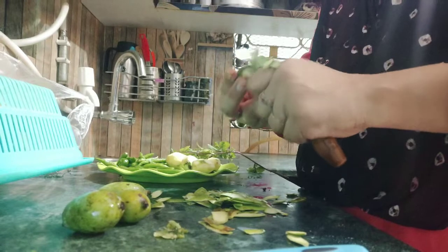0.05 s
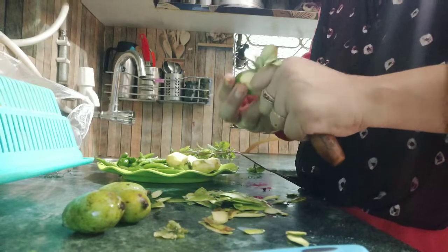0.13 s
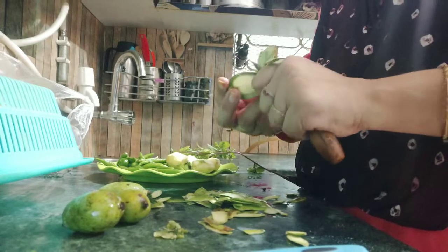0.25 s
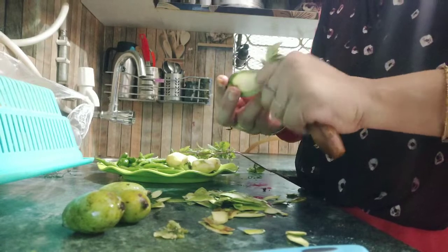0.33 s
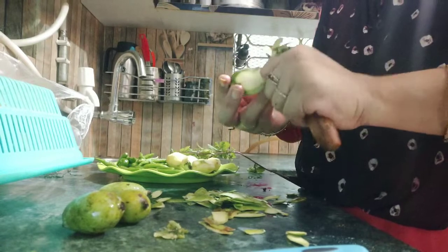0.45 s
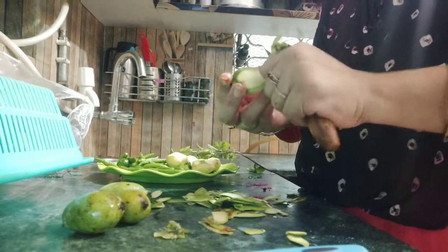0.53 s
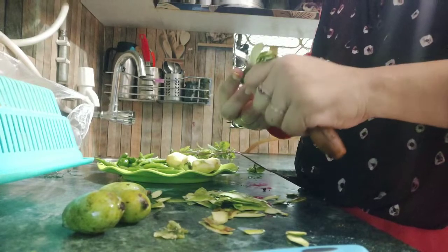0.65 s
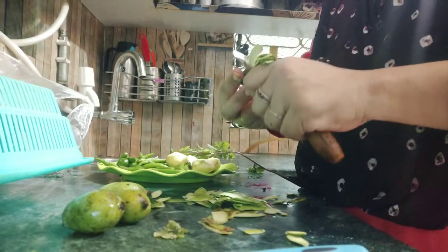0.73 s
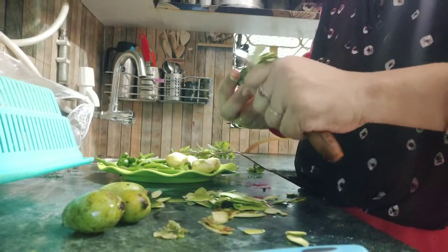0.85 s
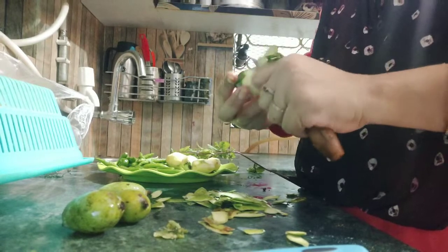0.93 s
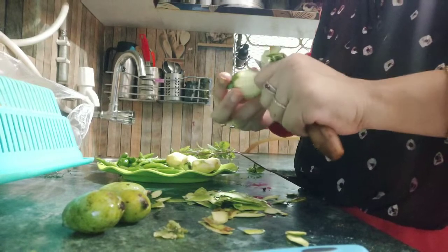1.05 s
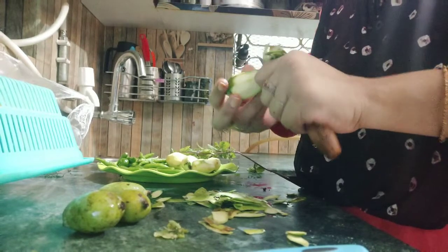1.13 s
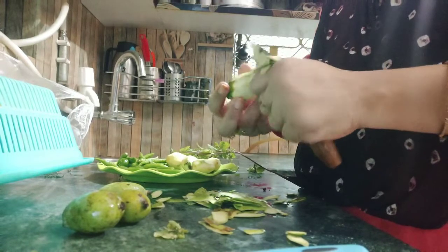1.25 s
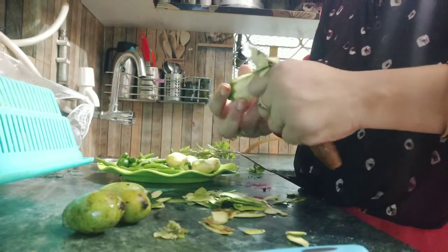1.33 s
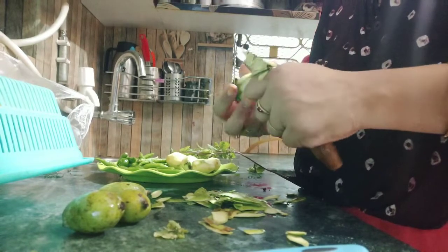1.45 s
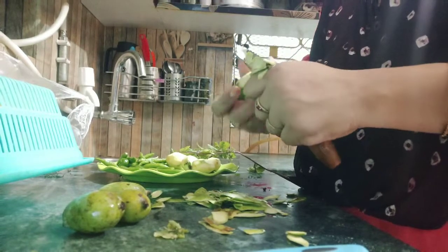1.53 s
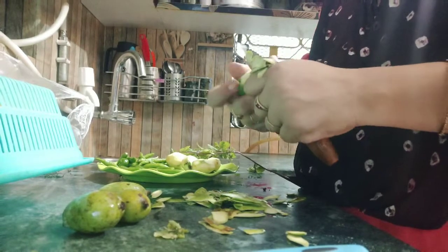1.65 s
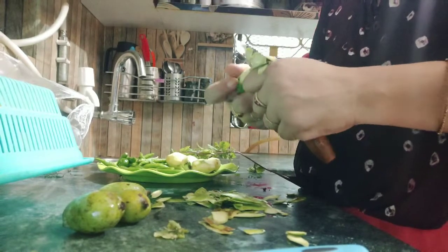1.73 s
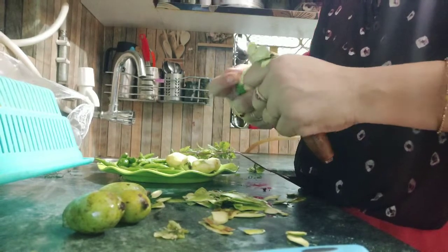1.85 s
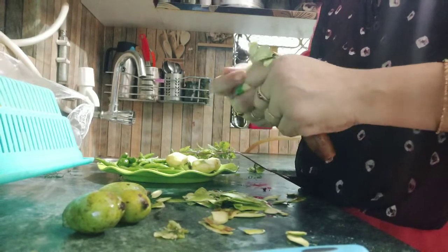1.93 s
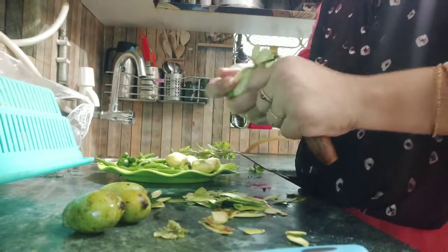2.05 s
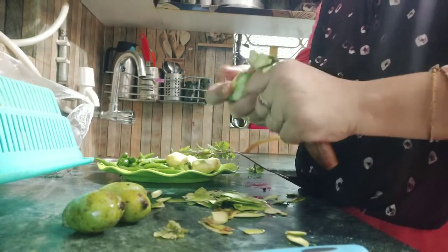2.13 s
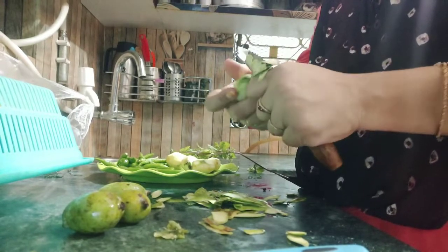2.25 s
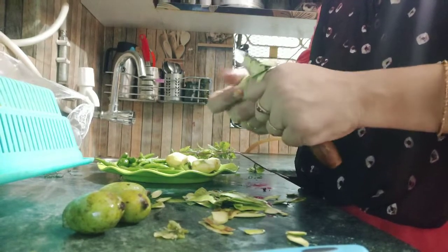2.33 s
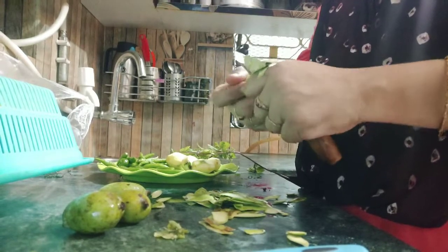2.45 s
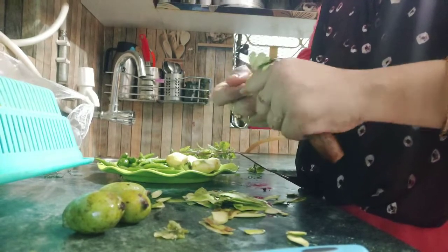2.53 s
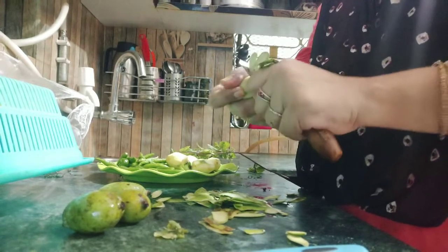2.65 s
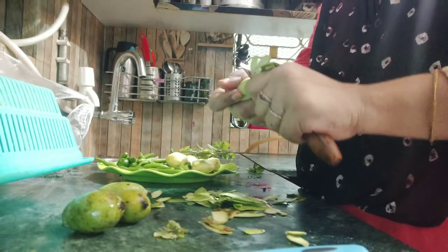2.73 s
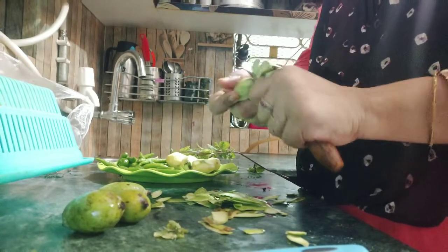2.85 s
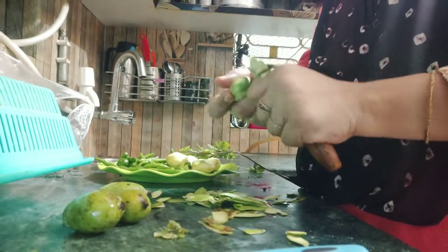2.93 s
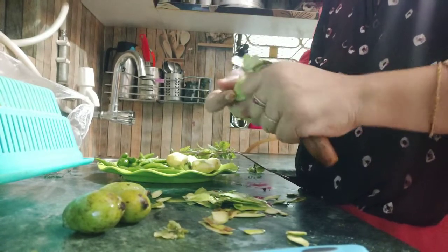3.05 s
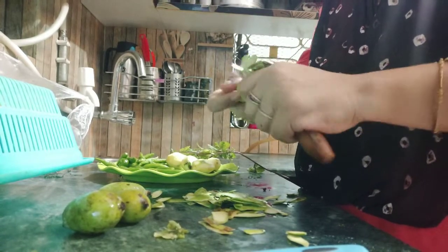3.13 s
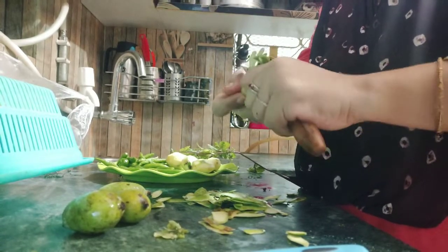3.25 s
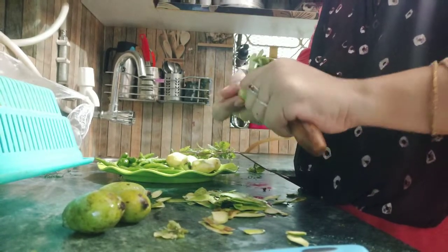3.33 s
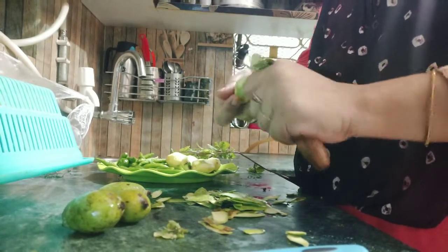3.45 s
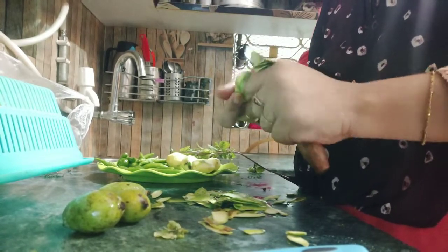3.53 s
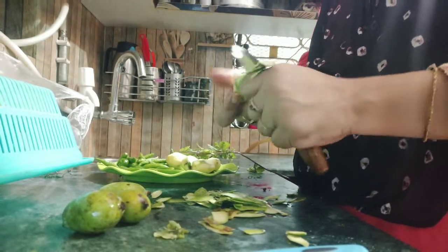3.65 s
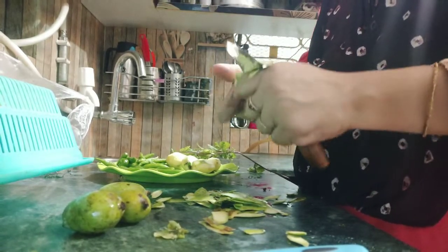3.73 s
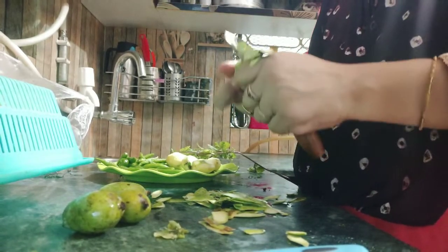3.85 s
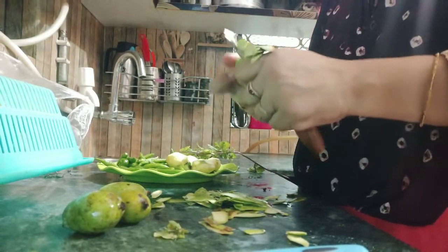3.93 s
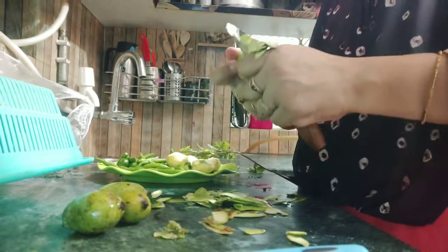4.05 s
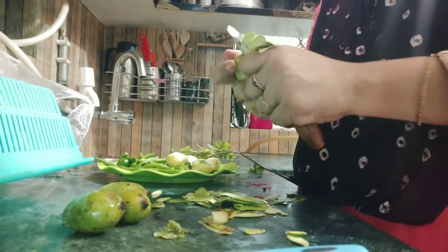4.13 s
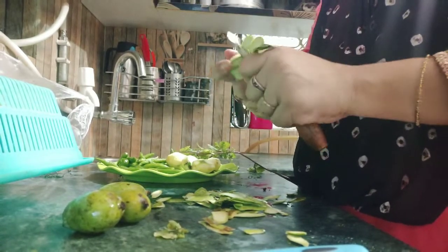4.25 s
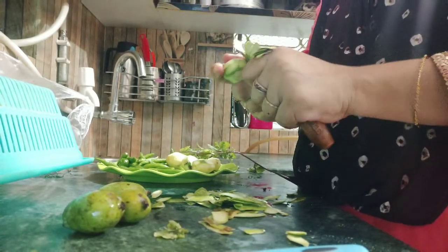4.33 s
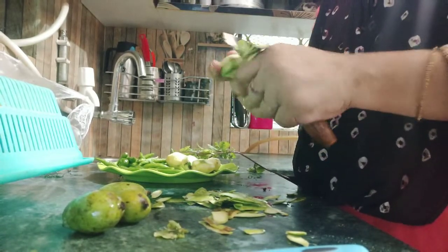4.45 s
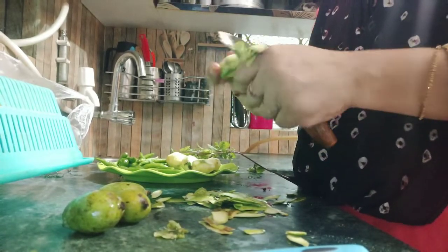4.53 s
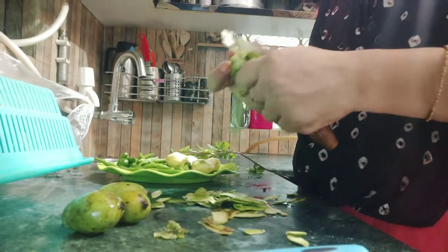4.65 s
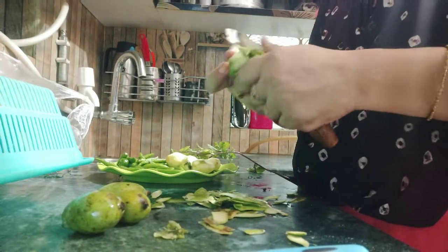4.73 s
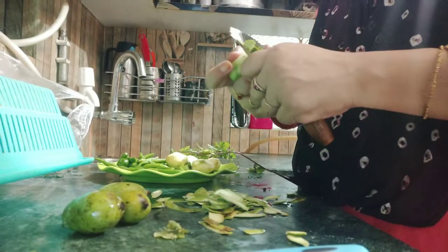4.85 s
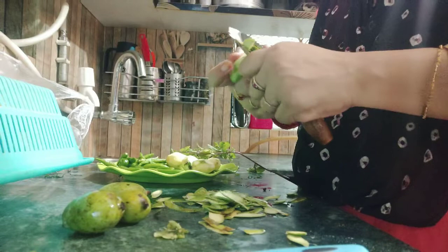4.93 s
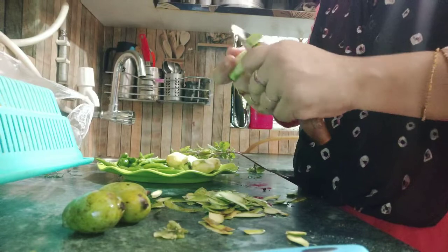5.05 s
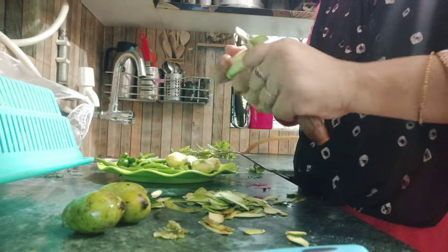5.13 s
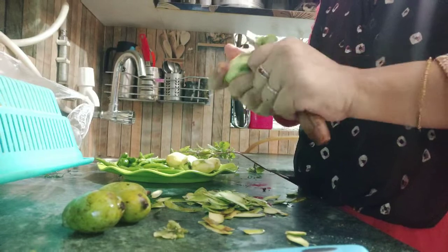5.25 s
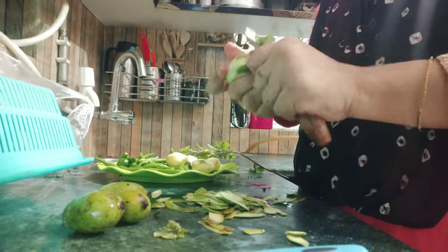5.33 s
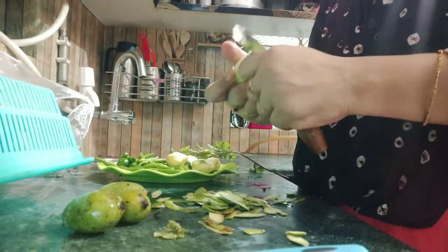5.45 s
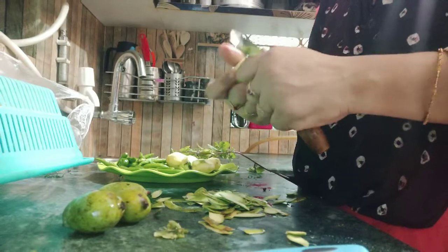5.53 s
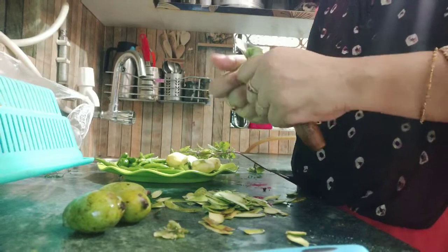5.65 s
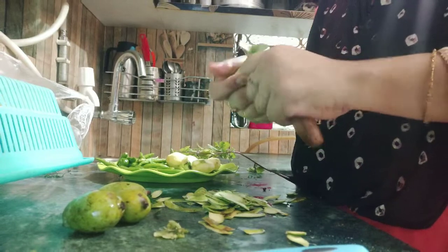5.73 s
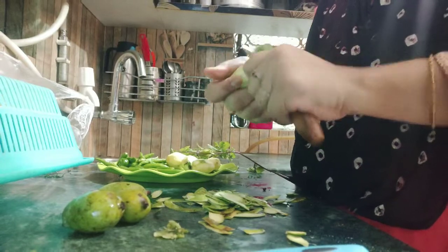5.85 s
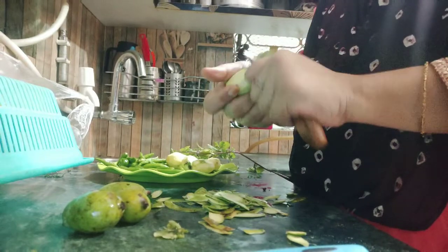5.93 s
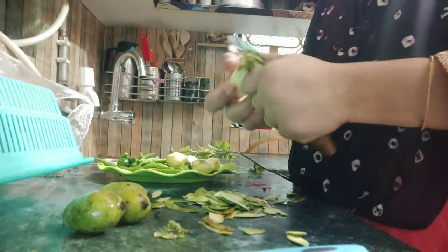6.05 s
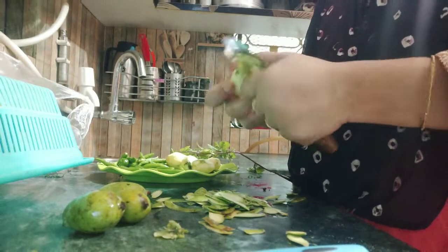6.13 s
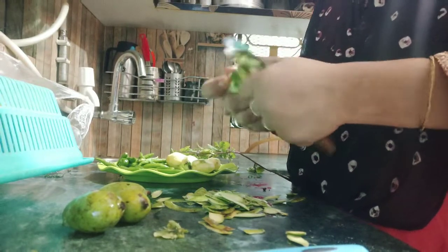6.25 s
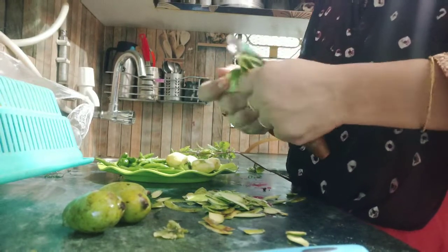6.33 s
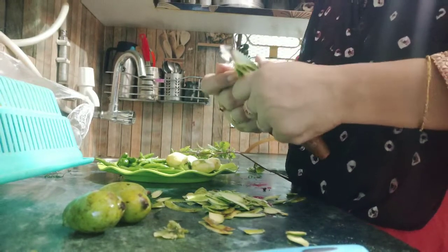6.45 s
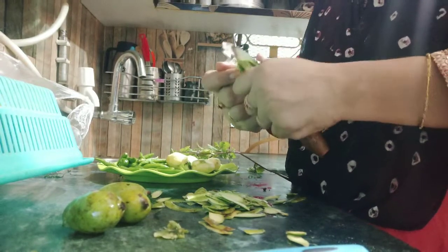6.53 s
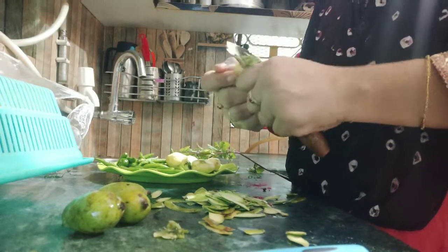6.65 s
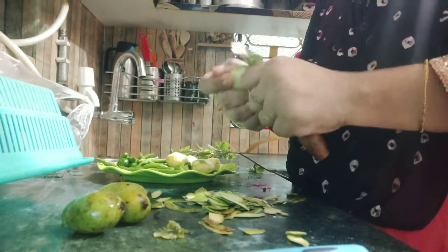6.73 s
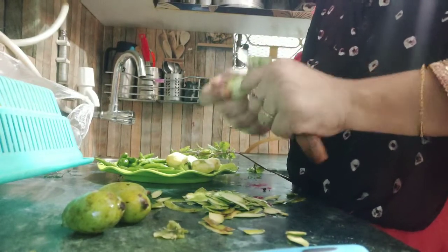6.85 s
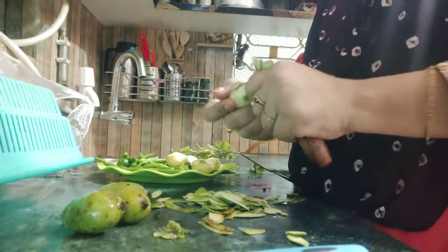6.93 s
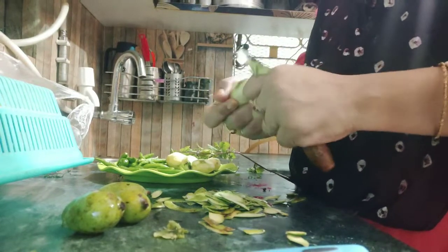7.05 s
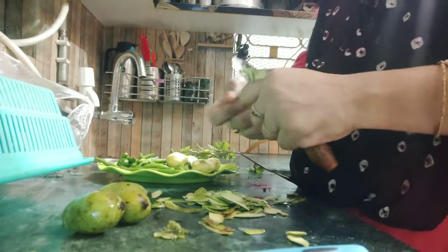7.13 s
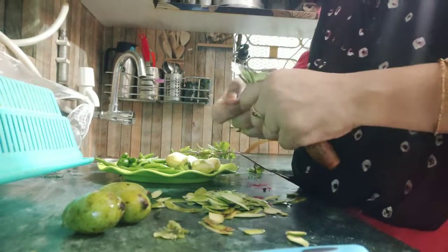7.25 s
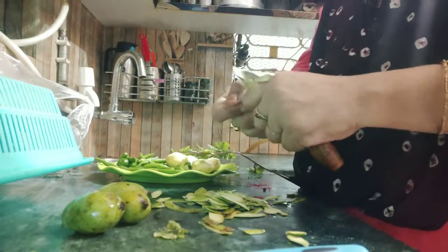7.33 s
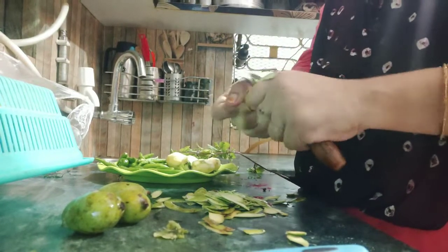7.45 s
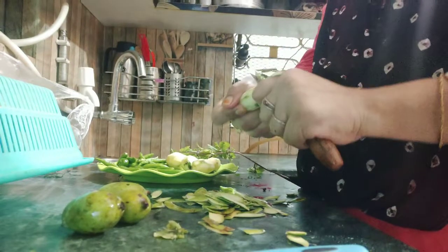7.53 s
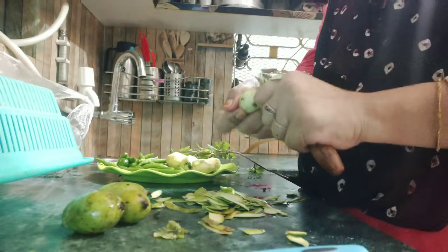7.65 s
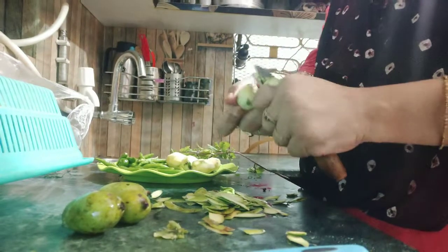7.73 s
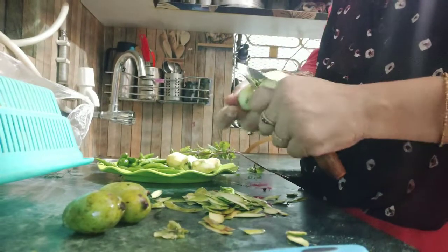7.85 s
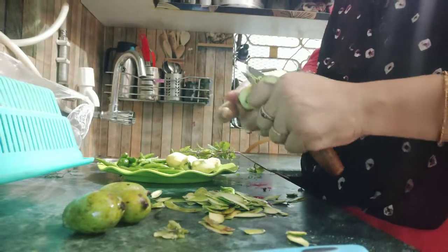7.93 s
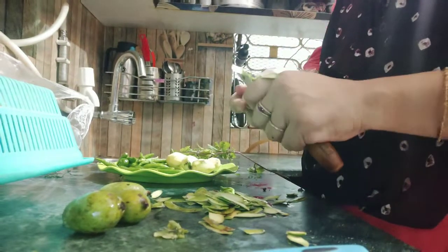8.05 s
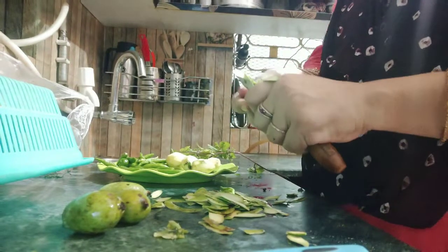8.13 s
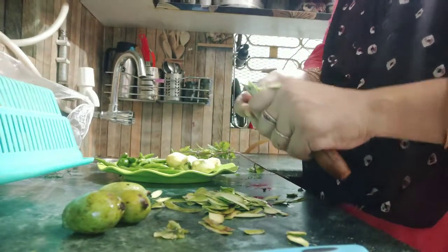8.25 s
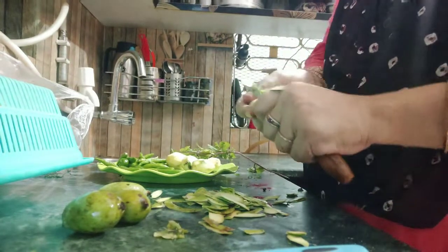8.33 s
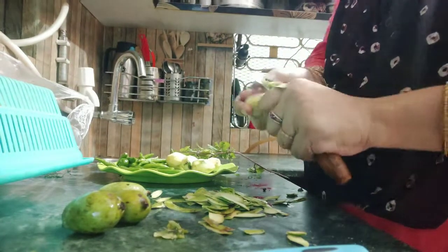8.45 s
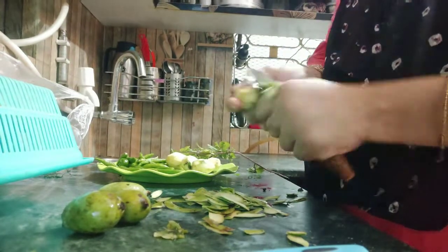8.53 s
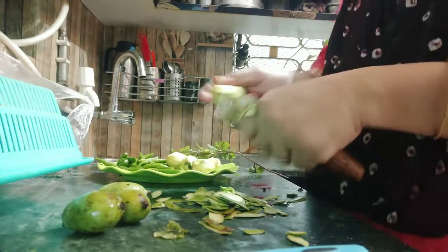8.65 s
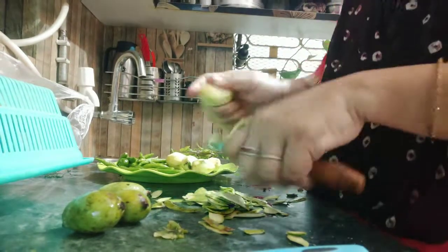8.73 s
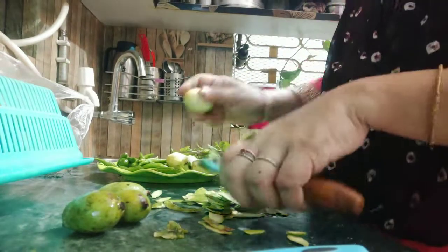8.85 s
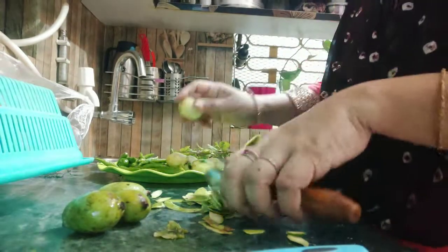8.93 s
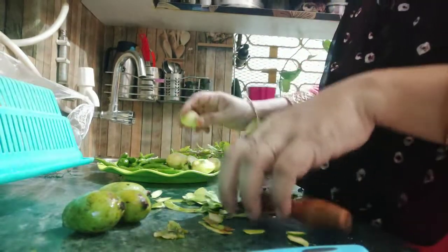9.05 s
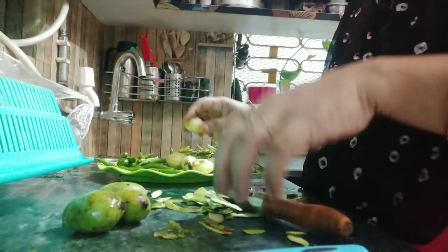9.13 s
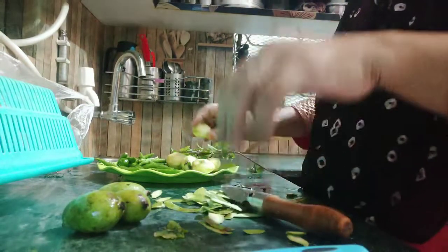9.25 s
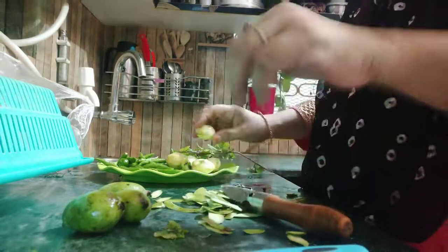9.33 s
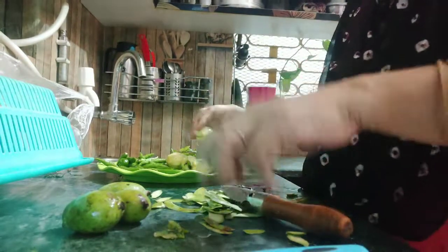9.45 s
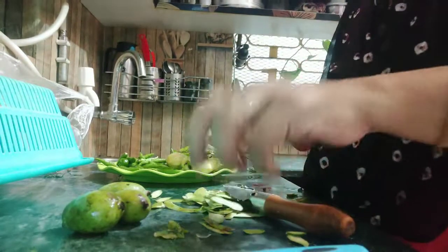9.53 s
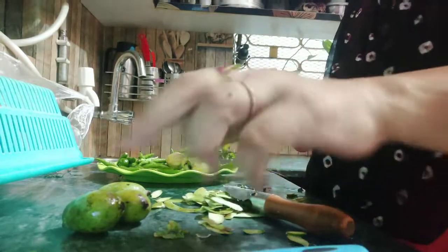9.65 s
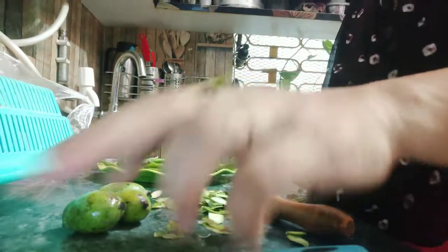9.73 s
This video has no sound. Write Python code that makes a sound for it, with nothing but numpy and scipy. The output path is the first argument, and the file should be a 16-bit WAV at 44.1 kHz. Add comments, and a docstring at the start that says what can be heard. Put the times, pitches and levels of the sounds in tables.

```python
"""Quiet kitchen, stone counter: a small knife peels a green mango held in the hand.
Strokes tear the skin: a stream of fracture clicks, with bigger snaps, excites resonances of blade, peel and hand.
Wet fingers squelch, the handled fruit squeaks, faint chirps come at random; hands and body bump softly.
At the end the knife is put down and bounces, then the fruit lands duller: clicks ring counter and blade modes.
A short room decay, a steady murmur and microphone hiss lie around it."""
import sys
import numpy as np
from scipy import signal
from scipy.fft import rfft, irfft
from scipy.io import wavfile
from scipy.ndimage import uniform_filter1d

SR = 44100
rng = np.random.default_rng(int(sys.argv[2]) if len(sys.argv) > 2 else 0)


def transcribe(u):
    """Save the signal u as a 16-bit wav file named by the first command-line argument.

    u: samples, shape (n,) or (channels, n), limited to [-1, 1]; the rate is SR.
    q: integer samples, one column per channel.
    """
    v = np.clip(np.atleast_2d(u).T, -1, 1)
    q = np.round(v * 32767).astype(np.int16)
    wavfile.write(sys.argv[1], SR, q)


N = 432180
TIME_S = np.arange(N) / SR

# blade bites, travels under the skin, lets go: t/s, bite/s, travel/s, drag level/dB before trim
STROKES = [(0.048, 0.008, 0.032, -43), (0.171, 0.0044, 0.1, -59.5), (0.847, 0.012, 0.097, -48),
           (0.969, 0.0082, 0.087, -54), (1.948, 0.056, 0.0088, -51.5), (2.684, 0.038, 0.064, -54),
           (3.201, 0.043, .01, -58.5), (3.377, 0.033, 0.017, -52), (4.121, .012, 0.12, -49.5),
           (5.045, 0.08, 0.097, -52), (5.79, 0.057, .01, -50), (6.625, 0.017, 0.045, -66),
           (6.726, 0.027, 0.0036, -48.5), (7.465, .022, 0.011, -51), (8.361, 0.028, 0.014, -46)]
# resonances of blade, peel and cupped hand, one list per stroke: f/Hz, level/dB relative, width/Hz
GRIPS = [
    [(1670,1,120),(2000,-11,190),(2366,3,71),(2710,-4,93),(3000,1,110),(3250,0.5,77),(3910,2,120),(4180,-2,130),(5000,-9,91),(5270,-9,130)],
    [(2950,4.5,180),(3550,-9,300),(4120,2,150),(4690,-1,67),(5430,-2,60)],
    [(2100,-8,120),(2363,5.5,42),(2720,6,83),(3180,0.5,130),(3970,-1.5,70),(4190,0,86),(4540,-2,73),(5280,-9,120)],
    [(2370,-5,77),(2870,-4,65),(3220,0,90),(3540,7,110),(4070,9.5,90),(4320,5.5,120),(4650,11,41),(5100,-15,150),(5500,-2,62)],
    [(2390,11.5,31),(3020,1.5,71),(3290,-6,110),(3940,6,72),(4570,-9,32),(5600,-29,51)],
    [(2410,11,170),(2740,2,120),(2870,-1,100),(3870,0.5,120),(4370,-5.5,38),(4570,-19,54),(5500,-22,57)],
    [(2372,6.5,43),(3100,-5,48),(4150,-19,60)],
    [(2440,-0.5,37),(2980,-3,110),(3030,3.5,150),(4060,-2.5,160),(4690,-3,75),(4960,-23,71)],
    [(2400,-13,60),(3003,9,69),(3120,2,78),(3510,3.5,110),(3950,-3,150),(4130,9,180),(4640,-5,51),(5300,-2,67),(5560,-24,61)],
    [(2990,9,76),(3460,-9,69),(3930,3.5,93),(4270,1.5,76),(4700,-20,47),(5360,-27,80)],
    [(2164,-3,68),(2780,-20,51),(3120,4,100),(3630,0.5,34),(4320,-10,67),(4590,-4,53),(4964,-0.5,46),(5600,-9,55)],
    [(3140,4,100),(4000,-3,130),(4660,4,90),(5250,-4,100)],
    [(2180,4,150),(2370,1,73),(3080,0.5,130),(3540,2,72),(3960,7.5,110),(4270,-15,120),(4600,4,57),(5130,-18,96),(5570,-28,27)],
    [(2370,-8,54),(2760,1,45),(3080,0.5,120),(4240,-8,64),(4650,-2,90),(4880,-4,55)],
    [(2390,3,48),(3010,3.5,110),(3260,-14,98),(3800,1.5,110),(4130,-4,48),(4400,-3,38),(5400,-25,55)],
]
# spectrum of fracture crackle and soft thud beside the ringing: f/Hz, level/dB relative
CRACKLE = [(30,9),(150,8),(600,6.5),(820,7.5),(970,10.5),(1150,6),(2000,-4.5),(6000,-54),(7200,4.5),(10000,3.5),(12800,-3),(13900,0),(15500,-21.5)]
STROKE_SPAN_S = 0.45


def peeling(drag_trim_db=-2, crackle_db=-15, catch_db=3, catch_hz=110,
            snap_rise_s=0.002, snap_decay_s=0.0042, snap_crackle_db=-3, follow_through_s=0.017):
    """Cells break in a dense stream under the blade, which catches unevenly and now and then snaps through."""
    fractures = grains(per_s=7000, spread_db=3.5)
    catching = from_db(catch_db * rms_one(cut(rng.standard_normal(N), catch_hz, "low")))
    ringing, tearing = np.zeros(N), np.zeros(N)
    for (start_s, bite_s, travel_s, db), grip in zip(STROKES, GRIPS):
        stroke = int(start_s * SR) + np.arange(int(STROKE_SPAN_S * SR))
        age_s = TIME_S[:len(stroke)]
        drag_db = db + drag_trim_db + drag_level_db(age_s, bite_s, travel_s)
        scrape = from_db(drag_db) * catching[stroke]
        # the tear opens just before it gives way
        snaps = np.zeros(len(stroke))
        for snap_s, peak_db in stroke_snaps(start_s, bite_s, travel_s, db):
            snap = from_db(peak_db) * swell(snap_s - snap_rise_s, snap_decay_s, snap_rise_s)[stroke]
            snaps = np.maximum(snaps, snap)
        progress = np.minimum(age_s / (bite_s + travel_s + follow_through_s), 1)
        ringing[stroke] += through_grip(np.maximum(scrape, snaps) * fractures[stroke], grip, progress)
        # snaps ring more than they crackle
        tearing[stroke] += np.maximum(scrape, from_db(snap_crackle_db) * snaps) * fractures[stroke]
    return ringing + from_db(crackle_db) * colour(tearing, CRACKLE)


def drag_level_db(age_s, bite_s, travel_s, bite_rise_db=15, let_go_db_per_s=274):
    """Drag re full strength: builds as the blade bites, holds, dies as it lets go."""
    biting_db = -bite_rise_db * np.maximum(1 - age_s / bite_s, 0)
    letting_go_db = -let_go_db_per_s * np.maximum(age_s - bite_s - travel_s, 0)
    return biting_db + letting_go_db


# loudest snaps, where the skin gives way: t/s, peak level/dB before trim
SNAPS = [(0.0598, -35), (.069, -37), (.0853, -42), (0.354, -45.5), (0.8782, -38), (0.944, -37.5),
         (0.9832, -35), (1.0026, -40), (1.0535, -42), (1.1004, -42.5), (2, -41.5), (2.015, -35.5),
         (2.7198, -34.5), (2.764, -39.5), (2.796, -41.5), (3.2432, -53), (3.3885, -40.5), (3.418, -31),
         (4.130, -36), (4.1654, -36), (4.1886, -26.5), (4.232, -30.5), (4.259, -37), (5.098, -46.5),
         (5.128, -52), (5.244, -44), (5.8308, -41.5), (5.8535, -36), (6.763, -35), (7.485, -45.5),
         (7.575, -54), (8.397, -38.5)]


def stroke_snaps(start_s, bite_s, travel_s, stroke_db, big_trim_db=-1,
                 small_per_s=40, small_db=4.5, small_spread_db=0.5):
    """Skin gives way in listed big snaps and a random run of lesser ones during travel: (s, peak dB)."""
    gaps = rng.uniform(0.5, 1.5, size=16)
    sizes = rng.standard_normal(size=16)
    snaps = []
    for age_s, size in zip(np.cumsum(gaps) / small_per_s, sizes):
        if age_s < travel_s:
            snaps.append((start_s + bite_s + age_s, stroke_db + small_db + small_spread_db * size))
    # big snaps belong to a stroke until the next one starts
    later_s = [row[0] for row in STROKES if row[0] > start_s]
    end_s = min(later_s + [start_s + STROKE_SPAN_S])
    return snaps + [(s, peak_db + big_trim_db) for s, peak_db in SNAPS if start_s <= s < end_s]


def through_grip(x, grip, progress, climb_db_per_octave=5, wander_db=3, wander_hz=35, skin_top_hz=5750):
    """Parallel resonances of one grip, dark below the lowest; power is about kept."""
    lowest_hz = min(grip)[0]

    def body(v, gains):
        """Sum the resonances, band-limited."""
        modes = [from_db(db) * resonate(v * gain, hz, width) for (hz, db, width), gain in zip(grip, gains)]
        return cut(cut(sum(modes), lowest_hz, "high", order=6), skin_top_hz, "low", order=8)

    hz = np.array(grip)[:, 0]
    # high resonances take over as the blade advances; their balance wanders at random
    climb_db = climb_db_per_octave * np.outer(np.log2(hz / hz.mean()), 2 * progress - 1)
    drift_db = wander_db * rms_one(cut(rng.standard_normal((len(grip), len(x))), wander_hz, "low"))
    impulse_response = body(signal.unit_impulse(SR // 10), np.ones(len(grip)))
    return body(x, from_db(climb_db + drift_db)) / np.linalg.norm(impulse_response)


# knife, then fruit, meet the counter:
# t/s, level/dB, contact hardness f/Hz, blade level/dB re level, scuff level/dB re click, scuff decay/s
KNOCKS = [(9.092,-7.5,3140,2,-29,0.0045),(9.1278,-12.5,1510,-8,-30,0.004),(9.1445,-16.5,1365,-18,-28,0.0065),(9.244,-34.5,950,-30,-9,0.0065),(9.484,-50.5,1110,-13.5,15,0.013),(9.49,-31.5,408,-29,8,0.013),(9.519,-14,1130,-12.5,-13.5,0.012),(9.546,-27,910,-30,-4,0.0079)]
# modes of the counter and what lands on it: f/Hz, level/dB, t60/s
COUNTER = [(193,-43,0.32),(231,-29.5,0.22),(366,-25,.06),(710,-27,0.04),(887,-44,0.41),(970,-16,0.0119),(1083,-7,0.0095),(1335,-6.5,0.0087),(1445,-19.5,0.013),(1900,-28,0.00587),(2156,-13,0.012),(2800,-22.5,0.0108)]
# steel blade modes: f/Hz, level/dB, t60/s
BLADE = [(4550,-28.5,0.018),(6000,-31.5,0.0195),(7670,-30,0.05),(13500,-53.5,.04)]


def knocks(crack_db=-24, crack_low_hz=2500, crack_top_hz=8000, body_low_hz=180):
    """Softer contact is a duller push with some scuff; blade level sets both blade ring and crack."""
    pushes, strikes, crack = np.zeros(N), np.zeros(N), np.zeros(N)
    grit = grains(per_s=10000, spread_db=9.0) / 10
    for s, db, hard_hz, blade_db, scuff_db, scuff_s in KNOCKS:
        click = signal.unit_impulse(N, round(s * SR))
        scuff = from_db(scuff_db) * swell(s, scuff_s, rise_s=0.0023) * grit
        pushes += from_db(db) * cut(click + scuff, hard_hz, "low", order=3)
        strikes += from_db(db + blade_db) * click
        crack += from_db(db + blade_db + crack_db) * swell(s, decay_s=0.0049, rise_s=0.000067)
    body = near_echoes(cut(ring(pushes, COUNTER), body_low_hz, "high", order=4))
    crack = cut(crack * rng.standard_normal(N), crack_low_hz, "high")
    return body + ring(strikes, BLADE) + cut(crack, crack_top_hz, "low", order=1)


def near_echoes(x, echoes=((0.0011, 0.55), (0.0022, 0.45))):
    """Counter and what stands on it send a blow back at once: (delay s, gain)."""
    return x + sum(gain * np.interp(TIME_S - delay_s, TIME_S, x, left=0) for delay_s, gain in echoes)


# wet fingers and juice: t/s, level/dB before trim, f/Hz, decay/s, spit level/dB re tone
SQUELCHES = [(0.069, -50.5, 8800, 0.012, 7.5), (0.86, -50, 13850, 0.078, -6),
             (1.459, -45.5, 14800, .018, -7), (2.708, -51, 13700, 0.022, -2), (3.29, -51, 6530, .009, -18),
             (4.132, -54, 14000, 0.061, -2), (4.152, -54, 10060, .016, -12),
             (4.217, -44.5, 7150, .013, -19), (5.001, -47.5, 8280, .0055, 2.5),
             (5.534, -58.5, 7380, 0.078, 0), (6.757, -49, 13900, 0.0091, 2),
             (7.482, -55, 14200, 0.0081, 5.5), (7.593, -50.5, 9870, 0.013, -13),
             (7.892, -50.5, 7160, 0.014, 1), (8.021, -46.5, 8300, 0.019, -8)]


def wet_fingers(trim_db=-4, width_hz=260, spit_low_hz=6500):
    """Films of juice part in small high crackles, each squelch with a pitch of its own."""
    films = grains(per_s=3700, spread_db=2.0)
    spit = rms_one(cut(films, spit_low_hz, "high", order=3))
    out = np.zeros(N)
    for s, db, hz, decay_s, spit_db in SQUELCHES:
        squelch = from_db(spit_db) * spit + tone(films, hz, width_hz)
        out += from_db(db + trim_db) * swell(s, decay_s, rise_s=0.0047) * squelch
    return out


def random_chirps(per_s, softest_db, range_db, low_hz, high_hz, peak_s, width_hz, handling_s=9):
    """Faint narrow-band chirps at random times and pitches, up to handling_s."""
    out, noise = np.zeros(N), rng.standard_normal(N)
    age = TIME_S[:SR // 10] / peak_s
    envelope = age * np.exp(1 - age)
    for when, pitch, size in rng.random(size=(int(per_s * handling_s), 3)):
        part = int(when * handling_s * SR) + np.arange(SR // 10)
        hz = low_hz * (high_hz / low_hz) ** pitch
        out[part] += from_db(softest_db + range_db * size) * envelope * tone(noise[part], hz, width_hz)
    return out


# small squeaks of handling the fruit and setting it down: t/s, level/dB before trim, f/Hz
SQUEAKS = [(.275, -56, 4760), (1.654, -61.5, 903), (1.868, -61, 878), (2.79, -59.5, 988),
           (3.411, -54.5, 972), (4.087, -56.5, 990), (4.792, -58.5, 1440), (4.994, -59.5, 924),
           (5.839, -55.5, 910), (6.76, -58.5, 990), (8.023, -59, 4490), (9.481, -60.5, 3530)]


def squeaks(decay_s=0.016):
    """Small squeaks of handling the fruit and setting it down: brief narrow-band friction."""
    rows = [(s, db, hz, decay_s) for s, db, hz in SQUEAKS]
    return rubs(rows, trim_db=-3.5, width_hz=43, rise_s=0.0068)


# hands and body: t/s, level/dB before trim, f/Hz, decay/s
BUMPS = [(0.009, -61, 102, 0.023), (0.09, -56, 166, 0.028), (0.762, -63.5, 112, 0.034),
         (1.12, -63, 177, 0.024), (4.37, -60, 98.5, 0.14), (6.533, -49.5, 173.4, 0.014),
         (8.711, -59, 187, 0.013)]


def bumps():
    """Hands and body bump, muffled: low narrow-band swells."""
    return rubs(BUMPS, trim_db=-2.5, width_hz=21, rise_s=0.0074)


def rubs(table, trim_db, width_hz, rise_s):
    """Brief noise swells into one resonance a row."""
    friction, out = rng.standard_normal(N), np.zeros(N)
    for s, db, hz, decay_s in table:
        out += from_db(db + trim_db) * swell(s, decay_s, rise_s) * tone(friction, hz, width_hz)
    return out


# kitchen decay: f/Hz, t60/s
KITCHEN_T60 = [(100,0.53),(260,0.27),(700,0.28),(1800,0.27),(4000,0.29),(12000,0.25)]


def kitchen(x, first_echo_s=0.004):
    """Dense echoes off tiles and counter, dying band by band; unit energy."""
    age_s = TIME_S[:SR // 2]
    tail = np.zeros(len(age_s))
    edges_hz = np.geomspace(40, 18000, 13)
    for low_hz, high_hz in zip(edges_hz, edges_hz[1:]):
        band = cut(rng.standard_normal(len(age_s)), [low_hz, high_hz], "band")
        t60_s = at_hz(KITCHEN_T60, np.sqrt(low_hz * high_hz))
        tail += band * np.exp(-np.log(1000) * age_s / t60_s)
    tail *= age_s > first_echo_s
    return signal.fftconvolve(x, tail / np.linalg.norm(tail))[:N]


# room murmur spectrum: f/Hz, level/dB relative
MURMUR = [(25,-11.5),(60,-18),(98,-3.5),(130,-19.5),(180,0.5),(290,-8.5),(470,-0.5),(700,-7.5),(950,-7),(1200,-11.5),(1500,-8.5),(1900,-14),(5800,-13),(7500,-45.5)]
# microphone hiss spectrum: f/Hz, level/dB relative
HISS = [(5600,-28.5),(6200,-1),(6800,5.5),(8300,4),(9000,2),(10300,2.5),(11700,-1.5),(12400,-1),(13300,-6.5),(15000,0.5),(15800,-5.5)]


def background(murmur_db=-69, hiss_db=-64.5, hiss_low_hz=4100):
    """Steady room murmur and microphone hiss: coloured noise; hiss level is before its high-pass."""
    murmur = from_db(murmur_db) * colour(rng.standard_normal(N), MURMUR)
    hiss = from_db(hiss_db) * colour(rng.standard_normal(N), HISS)
    return murmur + cut(hiss, hiss_low_hz, "high", order=4)


def from_db(db):
    """Decibels to gain."""
    return 10 ** (np.asarray(db) / 20)


def rms_one(x):
    """Scale to unit power."""
    return x / np.sqrt(np.mean(x ** 2) + 1e-20)


def at_hz(points, hz):
    """Read a table on a log-frequency axis."""
    f, value = np.transpose(points)
    return np.interp(np.log(np.maximum(hz, 1)), np.log(f), value)


def cut(x, hz, kind, order=2):
    """Butterworth filter."""
    sos = signal.butter(order, np.clip(hz, 10, 0.45 * SR), kind, fs=SR, output="sos")
    return signal.sosfilt(sos, x + 1e-18)


def colour(x, spectrum):
    """Give a white signal a spectrum and keep its power."""
    gain = from_db(at_hz(spectrum, np.arange(N // 2 + 1) * SR / N))
    return irfft(rfft(x) * rms_one(gain), N)


def resonate(x, hz, width_hz):
    """Two-pole resonance with gain 1 on top."""
    r = np.exp(-np.pi * width_hz / SR)
    numerator = np.array([1, 0, -1]) * (1 - r * r) / 2
    denominator = [1, -2 * r * np.cos(2 * np.pi * hz / SR), r * r]
    return signal.lfilter(numerator, denominator, x + 1e-18)


def tone(x, hz, width_hz):
    """A narrow resonance kept ringing at an even level."""
    v = resonate(resonate(x, hz, width_hz), hz, width_hz)
    return v / np.sqrt(np.abs(uniform_filter1d(v ** 2, size=1000)) + 1e-14)


def ring(clicks, modes):
    """Each click sets decaying sines going."""
    out = np.zeros(N)
    for hz, db, t60_s in modes:
        r = np.exp(-np.log(1000) / (t60_s * SR))
        w = 2 * np.pi * hz / SR
        sine = signal.lfilter([0, np.sin(w)], [1, -2 * r * np.cos(w), r * r], clicks + 1e-18)
        out += from_db(db) * sine
    return out


def grains(per_s, spread_db):
    """Random clicks of uneven size, their power evened over a few milliseconds."""
    hits = rng.random(N) < per_s / SR
    clicks = hits * rng.choice([-1, 1], N) * from_db(spread_db * rng.standard_normal(N))
    return clicks / np.sqrt(np.abs(uniform_filter1d(clicks ** 2, size=260)) + 1e-6)


def swell(s, decay_s, rise_s):
    """A quick rise at time s and an exponential fall; height 1."""
    out, start = np.zeros(N), max(int(s * SR), 0)
    age_s = TIME_S[:min(int(10 * decay_s * SR) + 2, N - start)]
    shape = (1 - np.exp(-age_s / rise_s)) * np.exp(-age_s / decay_s)
    out[start:start + len(age_s)] = shape / shape.max()
    return out


def scene(hand_room_db=-7, counter_room_db=-5, slab_hz=930, slab_width_hz=300, slab_share=0.42):
    """Hands and counter share one small room."""
    high_chirps = random_chirps(per_s=18, softest_db=-71.75, range_db=7, low_hz=6540, high_hz=14640,
                                peak_s=0.0079, width_hz=100)
    low_chirps = random_chirps(per_s=6, softest_db=-80, range_db=10, low_hz=1497, high_hz=5660,
                               peak_s=0.0093, width_hz=41)
    hands = peeling() + wet_fingers() + high_chirps + low_chirps + squeaks() + bumps()
    counter = knocks()
    # the slab's main ring reaches the microphone standing on it more than it fills the room
    airborne = counter - slab_share * resonate(counter, slab_hz, slab_width_hz)
    room = kitchen(from_db(hand_room_db) * hands + from_db(counter_room_db) * airborne)
    return (hands + counter + room + background())[None]


def record(dry, cutoff_hz=15700):
    """The top is cut steeply by an elliptic low-pass."""
    sos = signal.ellip(12, 0.1, 80, cutoff_hz, fs=SR, output="sos")
    return signal.sosfilt(sos, dry)


dry = scene()
out = record(dry)
transcribe(out)
```